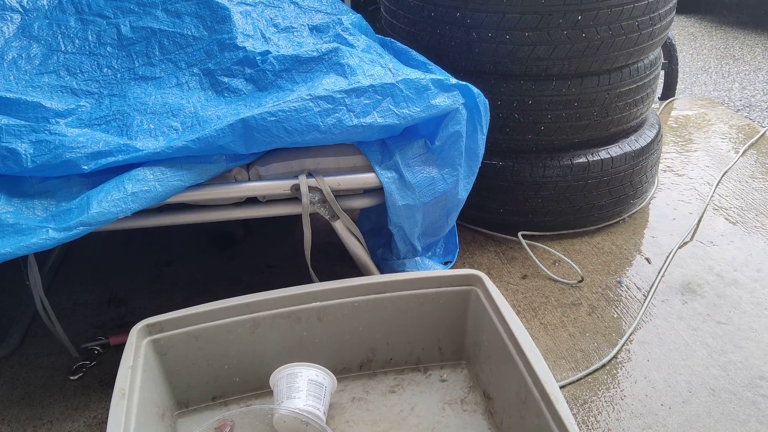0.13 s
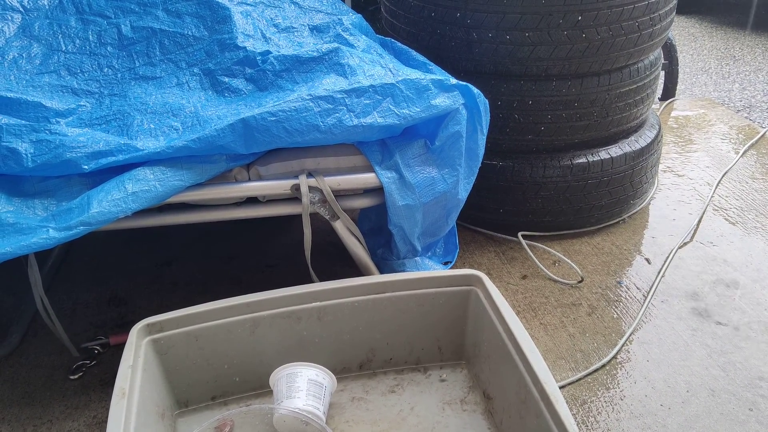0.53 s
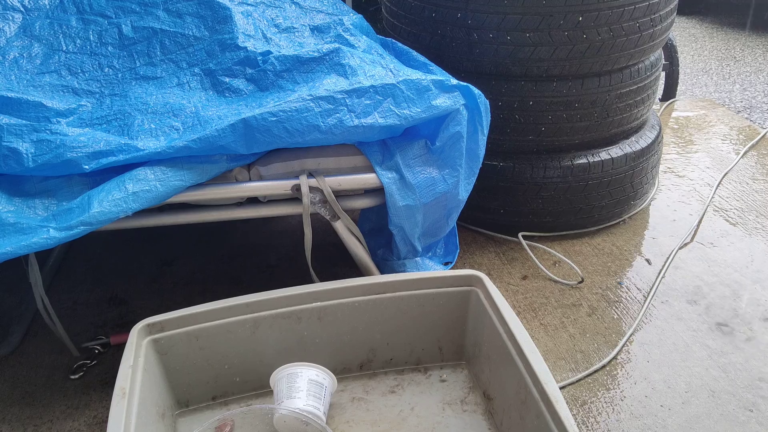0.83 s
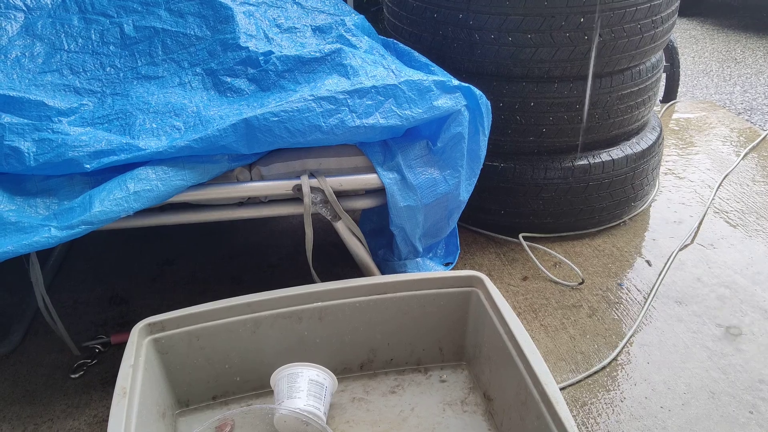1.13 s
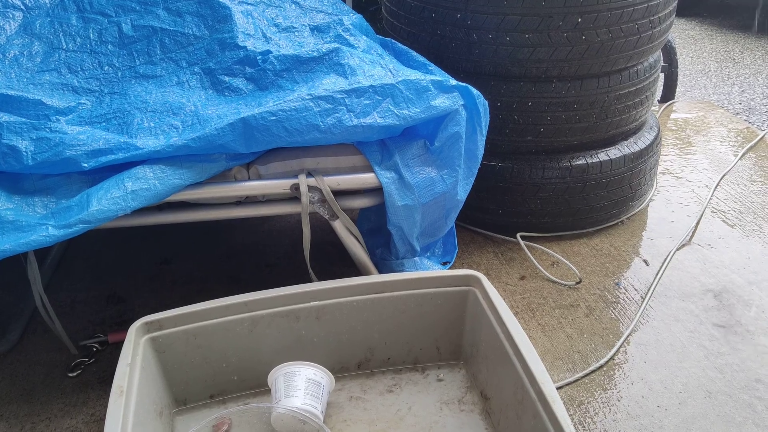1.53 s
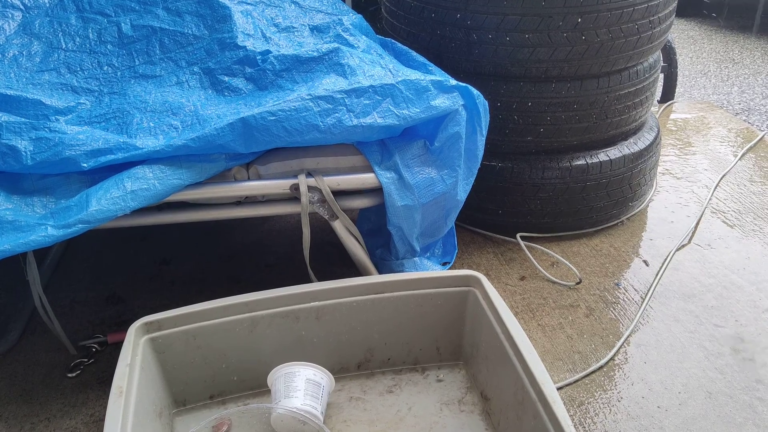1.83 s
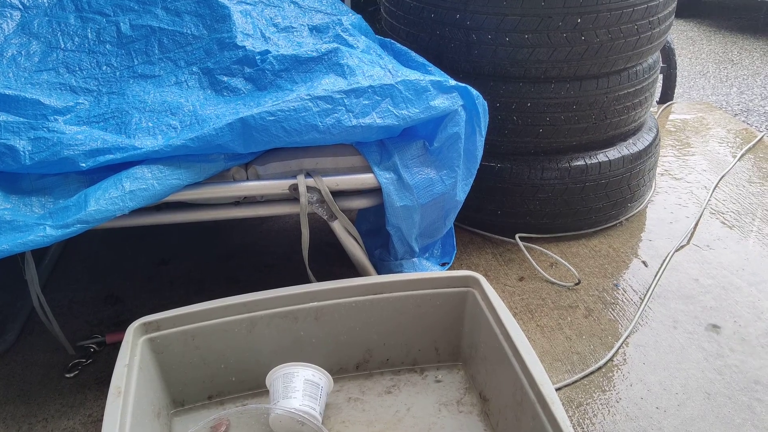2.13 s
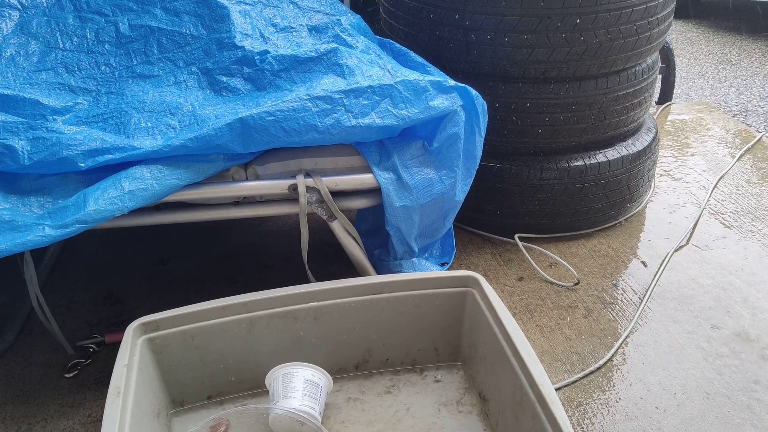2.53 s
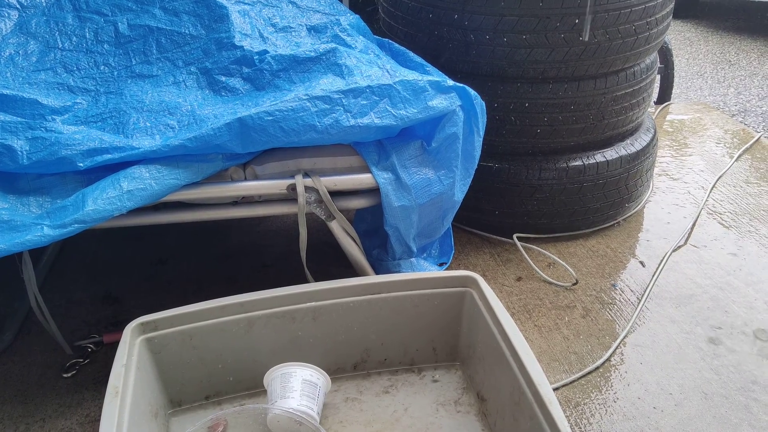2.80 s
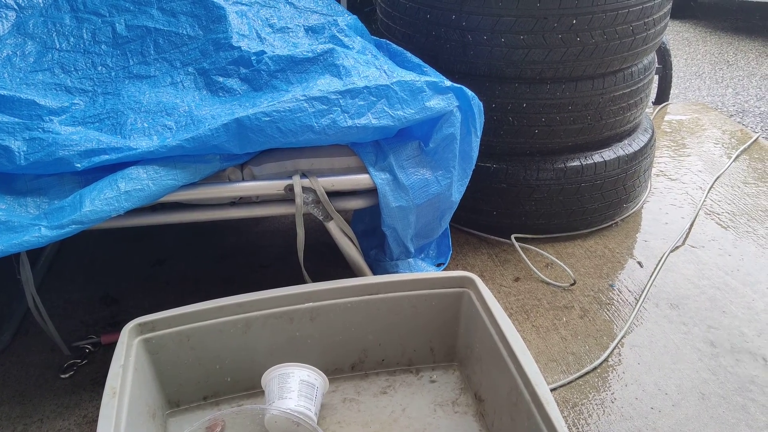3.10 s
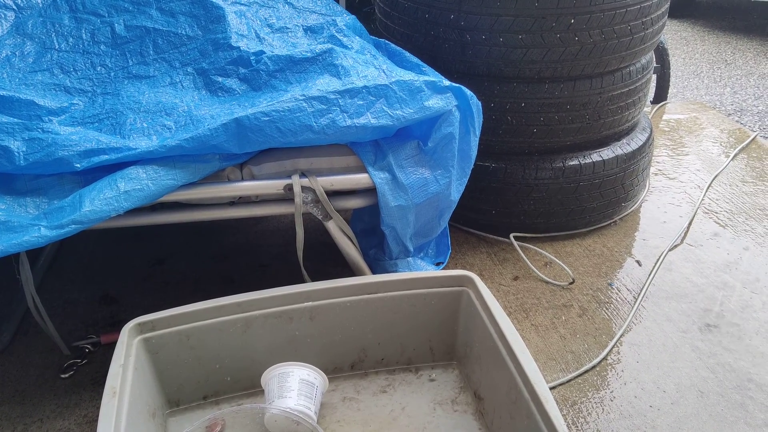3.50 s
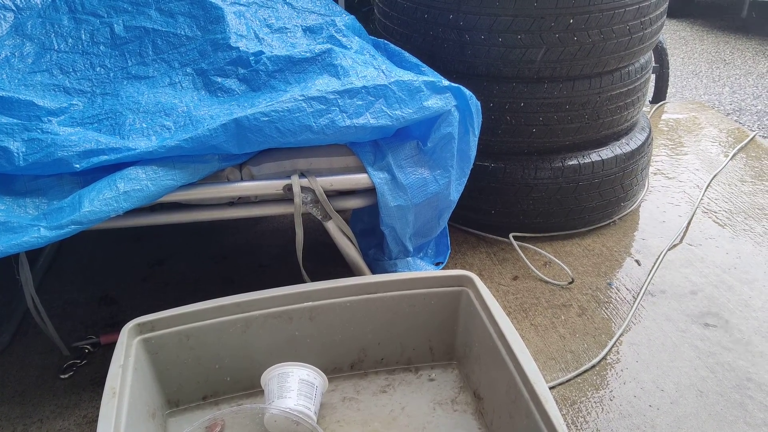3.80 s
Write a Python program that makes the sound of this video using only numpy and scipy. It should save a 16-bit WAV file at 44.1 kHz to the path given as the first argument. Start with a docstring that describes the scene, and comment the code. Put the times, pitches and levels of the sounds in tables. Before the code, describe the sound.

Rain on a plastic tarp: crisp, bright snaps with short crackling wet tails over steady hiss and tiny patter. Strong drops land at 0.15 s, then weaken around 0.8-1.5 s. More hits follow at 1.6-1.7, a heavy one at 2.4, and a dense run from 2.8, strongest near 3.7. Dull splashes scatter throughout; a soft scuff brushes at 3.1. A barely audible far engine and thin whine appear late, over faint hum.

```python
"""Outdoors, beside a taut plastic tarp over concrete, light rain is falling.
Big close drops snap on the tarp: a click, quick reflections and a short wet tail of crackling noise.
Small drops patter and bubble around them over the hiss of rain, made from shaped, flickering noise.
A few duller splashes and one soft scuff are soft-edged bursts of noise.
Gliding tones make a far engine that changes gear and a thin whine; a steady tone is the faint mains hum."""
import sys
import numpy as np
from scipy import signal
from scipy.fft import rfft, irfft
from scipy.io import wavfile
from scipy.ndimage import uniform_filter1d

SR = 44100
rng = np.random.default_rng(int(sys.argv[2]) if len(sys.argv) > 2 else 0)


def to_wav(sig):
    """Store sig (one row per channel, or 1-D mono) as 16-bit WAV at the path in sys.argv[1].

    Samples outside -1..1 are clipped; the rate is SR.
    """
    pcm = np.clip(np.atleast_2d(sig), -1, 1) * 32767
    pcm = np.round(pcm).astype(np.int16)
    wavfile.write(sys.argv[1], SR, pcm.T)  # frames by channels


N = 174195  # length of the scene in samples
RING_SAMPLES = 8192  # room for one drop or bubble to die away
TOP_HZ = 7980  # the sound is cut steeply above this

# Rain on concrete and the far surroundings. Each row: frequency in Hz, relative level in dB.
WASH_COLOUR = [(25, -42), (45, -29), (65, -14.5), (90, -24), (130, -7.5), (180, -10.5), (300, -10.5),
               (550, -14), (950, -13.5), (1500, -15.5), (2600, -17.5), (4000, -13.5), (5100, -12.5),
               (5800, -10), (6400, -1.5), (7000, -10), (7900, -14.5)]
WASH_DB = -49
WASH_SWELL_DB, WASH_SWELLS_PER_S = 0.32, 1.3
WASH_FLICKER_DB, WASH_FLICKERS_PER_S = 1.2, 25.205

# Treble of the steady rain over time. Each row: time in seconds, gain in dB.
TREBLE_GAIN = [(0, 2.5), (.48, -4), (.75, 0), (1.12, -3.5), (1.16, -11), (1.21, 1.5), (1.33, -2.5),
               (1.385, -8.5), (1.43, 0), (1.9, -0.5), (2.28, -3.5), (2.34, -2), (2.42, -2), (2.699, 2.5),
               (3.3, 0), (3.62, 1), (3.87, -2), (3.95, 0.5)]
TREBLE_FROM_HZ = 4260
FLICKER_WIDTH_HZ, FLICKER_PER_S, FLICKER_DB = 530, 28, 2.2

# Colour of a drop on the tarp. Each row: frequency in Hz, relative level in dB.
TARP_COLOUR = [(100, -57), (800, -53), (1500, -42.5), (2500, -33), (3300, -24.5), (4100, -20.5),
               (4900, -12.5), (5500, -8.5), (6100, -2.5), (6450, 1), (6900, -3), (7400, -9.5), (7900, -13)]
BODY_HZ, PEAK_HZ, BRIGHT_HZ = 4450, 6190, 7300  # body acts below the peak, brightness above it
SNAP_S = 0.0031  # the snap's energy equals this many seconds at full level

# Reflections off nearby surfaces. Each row: typical delay in seconds, level in dB against the click.
REFLECTIONS = [(.00125, -4), (.0026, -12)]
DELAY_SPREAD = 0.13  # each drop stretches the delays by chance, about 13 percent

# The wet tail after each snap
TAIL_DB, TAIL_RISE_S, TAIL_T60_S, TAIL_GRAIN_DB = 5, 0.0062, 0.17, 6.5  # T60: time to fall 60 dB
FLAP_DB, FLAP_S = 3, 0.0012  # the tail comes in uneven little flaps
SURFACE_SHARE = 0.35  # part of each tail's power that is the same scatter off the surroundings

# Faint rings of the plastic nearby. Each row: frequency in Hz, relative level in dB.
PLASTIC_RINGS = [(4930, -16.5), (6090, -1.5), (6330, 2.5), (6570, -9)]
RING_DB, RING_T60_S = -14.5, 0.13  # level before the rings die away

PATTER_PER_S, PATTER_SPREAD_DB, PATTER_DB, PATTER_TAIL_DB = 160, 4.2, -51, -9.5

# Faint bubbles in the puddles
BUBBLES_PER_S, BUBBLE_LOW_HZ, BUBBLE_HIGH_HZ = 50, 550.7, 2994
BUBBLE_RISE_PER_S = 1.2  # pitch gained per second, as a share of the starting pitch
BUBBLE_DB, BUBBLE_RANGE_DB, BUBBLE_ATTACK_S, BUBBLE_T60_S = -68, 8, 0.006, 0.079

HUM_HZ, HUM_DB = 119.6, -70

# Close drops on the tarp. Each row: start in seconds, snap level in dB before DROP_TRIM_DB is added,
# tail gain in dB against the snap, body in dB, brightness in dB.
CLOSE_DROPS = [(0.1461, -12.5, -11, 6, -5.5), (0.1624, -21, -16, 2, 4), (0.2123, -25, -14.5, -3, 5.5),
               (0.277, -49, -18, -5, 2.5), (0.3, -32, -11.5, 0, 4), (0.3913, -22.5, -10, -4.5, -8.5),
               (0.4086, -24, -10.5, -11.5, -24), (0.525, -30, -10, -4, 2), (0.5589, -19, -11.5, -9.5, -6),
               (0.6351, -25.5, -10.5, 0, -7.5), (0.716, -41.5, -6, -12, -4),
               (0.7848, -33.5, -9.5, -2, -2.5), (0.812, -39.5, -3, 2, 4), (0.8478, -34, -13.5, -6, 2.5),
               (0.877, -41, -16, -13, -11), (0.99, -43, -15, -10, -5), (1.021, -42, -15, -10, 4),
               (1.214, -39, -18, -10, 4), (1.2239, -33, -13, -6, 9), (1.2909, -30.5, -8.5, 0.5, -1.5),
               (1.3034, -32.5, -18, -13, -3.5), (1.4489, -31.5, -14, -7, -7), (1.4666, -37, -24, -4, 4),
               (1.5359, -32, -11.5, -5, -2), (1.594, -27, -12.5, -2, -0.5),
               (1.6253, -22, -11.5, -5.5, -7.5), (1.7145, -21, -10, -8.5, 0.5), (1.7336, -30, -6, -2, -1),
               (1.838, -28, -10, -5, 1.5), (2.12, -34.5, -9, -13.5, 0), (2.175, -40, -11, -6, -1),
               (2.198, -38, -7.5, 3.5, -3), (2.2361, -31.5, -13, 0.8, 9.5), (2.394, -13.5, -12.5, 4, -5),
               (2.4394, -35, -8, 11, 8), (2.451, -24, -14.5, -10, 3.5), (2.521, -46.5, -5, -4, -4),
               (2.5756, -23, -11.5, -9.5, -1), (2.7793, -40, -8, -4, -7), (2.814, -20.5, -12.5, 3, -0.5),
               (2.883, -35, -15, -11, 9), (2.933, -35, -20, 8, -2), (2.9966, -25.5, -10.5, 6, 7),
               (3.1212, -26, -8.5, -1, 2.5), (3.148, -30, -10.5, -13, 3.5), (3.1931, -24, -14, -5, 0.5),
               (3.2736, -24, -12.5, -11, 10), (3.299, -24, -10.5, -5.5, -19),
               (3.4131, -23, -11.5, -12.5, -5), (3.592, -39.5, -16, -6.5, -3.5), (3.62, -42.5, -10, -5, -1),
               (3.655, -39, -6.5, -6, -1), (3.682, -15.5, -12, -5.5, -4.5),
               (3.7408, -16.5, -11.5, -0.5, -1.5), (3.7965, -27.5, -11.5, -0.5, 4)]
DROP_TRIM_DB = 0.5

# Duller splashes further off. Each row: time of the peak in seconds, level in dB before the fades,
# centre in Hz, width in octaves, rise in seconds, time to fall 60 dB in seconds.
SPLASHES = [(.28, -57, 1400, 0.15, .006, 0.053), (.752, -56, 1910, 0.3, 0.0045, 0.065),
            (1.062, -47.5, 6700, .15, 0.0081, .12), (1.118, -47, 5820, .1, .012, 0.15),
            (1.195, -51, 6100, 0.055, 0.017, .12), (1.34, -53.5, 2640, 0.53, 0.022, 0.23),
            (1.42, -44.5, 5800, 0.43, 0.013, .14), (1.975, -54.5, 2080, 0.29, 0.006, .1),
            (2.935, -47, 2130, 0.11, 0.0045, .04), (3.63, -59, 750, 0.96, 0.027, 0.19),
            (3.755, -45.5, 3550, 0.17, 0.011, 0.098), (3.925, -47.5, 4200, 0.34, 0.015, 0.14)]
# A soft scuff, a low bump and then a swish. Each row: time of the peak in seconds, level in dB before
# the fades, centre in Hz, width in octaves, rise in seconds, time to fall 60 dB in seconds.
SCUFF = [(3.04, -51, 240, 1.4, 0.026, 0.42), (3.114, -46, 1095, 0.69, 0.024, 0.28),
         (3.118, -43, 2290, 1.1, 0.031, 0.3)]
BURST_LOW_HZ = 95  # splashes and scuff carry no deep bass

# Far engine. Each row: time in seconds, firing frequency in Hz, level in dB before the waver.
ENGINE = [(2.3, 164, -90), (2.42, 169, -70), (2.51, 176, -62), (2.58, 180, -71), (2.65, 160, -85),
          (2.73, 133, -68), (2.86, 136, -64), (3.02, 142, -68), (3.27, 144, -63), (3.42, 137, -71),
          (3.55, 142, -67), (3.66, 147, -61), (3.73, 156, -68), (3.8, 153, -65), (3.95, 146, -78)]
# A thin far whine. Each row: time in seconds, frequency in Hz, level in dB before the waver.
WHINE = [(3.25, 362, -90), (3.36, 358, -68), (3.45, 353, -66), (3.63, 361, -69), (3.75, 368, -90)]

LEAK_DB = -45.5  # shift of the faint sound that passes the steep cut


def undb(db):
    """Turn decibels into gain."""
    return 10 ** (np.asarray(db) / 20)


def level(x, db):
    """Scale a sound to an average (rms) level in dB."""
    return x * undb(db) / np.sqrt(np.mean(x ** 2))


def bins(size):
    """List the frequencies in the spectrum of a sound this long, never below 1 Hz."""
    return np.maximum(np.fft.rfftfreq(size, 1 / SR), 1)


def curve(points, hz):
    """Read (Hz, dB) points at any frequency, with octaves evenly spaced."""
    point_hz, db = np.array(points).T
    return np.interp(np.log(hz), np.log(point_hz), db)


def causal(db):
    """Build a minimum-phase response with this gain, so that a hit starts sharply."""
    cepstrum = irfft(np.log(undb(db)))
    half = len(cepstrum) // 2
    cepstrum[1:half] *= 2
    cepstrum[half + 1:] = 0
    return np.exp(rfft(cepstrum))


def noise(db):
    """Make noise with this gain at each frequency."""
    return irfft(rfft(rng.standard_normal(N)) * undb(db), N)


def walk(rate):
    """Wander smoothly by chance, with about this many random steps per second and a spread of 1."""
    step = int(SR / rate)
    stairs = np.repeat(rng.standard_normal(N // step + 2), step)
    smooth = uniform_filter1d(uniform_filter1d(stairs, step), step)[:N]
    return smooth / smooth.std()


def fade(t, t60):
    """Die away by 60 dB in t60 seconds."""
    return np.exp(-np.log(1000) * t / t60)


def add(out, start_s, x):
    """Mix a sound into out from this time."""
    i = int(np.clip(start_s * SR, 0, N - 1))
    out[i:i + len(x)] += x[:N - i]


def wash():
    """Distant rain: noise in octave bands that swell together and flicker alone."""
    hz, swell, out = bins(N), walk(WASH_SWELLS_PER_S), np.zeros(N)
    spectrum = rfft(noise(curve(WASH_COLOUR, hz)))
    for octave in np.arange(4, 15):  # band centres are powers of two, from 16 Hz up
        overlap = np.maximum(1 - abs(np.log2(hz) - octave), 0)
        band = irfft(spectrum * overlap, N)
        flicker_db = WASH_FLICKER_DB * walk(WASH_FLICKERS_PER_S)
        out += band * undb(WASH_SWELL_DB * swell + flicker_db)
    return level(out, WASH_DB)


def surroundings():
    """The scatter all drops share: dense random echoes, and a few plastic rings that die away."""
    t = np.arange(RING_SAMPLES) / SR
    echoes = rng.standard_normal(RING_SAMPLES)
    rings = sum(undb(db) * np.sin(2 * np.pi * (hz * t + rng.random())) for hz, db in PLASTIC_RINGS)
    return echoes, level(rings, RING_DB) * fade(t, RING_T60_S)


def drop(place, tail_db, body_db, bright_db, pitch=1):
    """A click and its reflections ring the tarp, then crackling spray and scattered echoes die away."""
    hz, t = bins(RING_SAMPLES), np.arange(RING_SAMPLES) / SR
    echoes, rings = place
    tilt_db = curve([(BODY_HZ, body_db), (PEAK_HZ, 0), (BRIGHT_HZ, bright_db)], hz)
    colour = causal(curve(TARP_COLOUR, hz / pitch) + tilt_db)

    paths = 1  # the direct click
    for delay_s, db in REFLECTIONS:
        delay_s = delay_s * np.exp(DELAY_SPREAD * rng.standard_normal())
        paths = paths + undb(db) * np.exp(-2j * np.pi * hz * delay_s)
    snap = irfft(colour * paths)
    snap /= np.sqrt(np.sum(snap ** 2) / (SNAP_S * SR))

    grain_gain = undb(TAIL_GRAIN_DB * rng.standard_normal(RING_SAMPLES))
    spray = level(rng.standard_normal(RING_SAMPLES) * grain_gain, 0)
    flap_gains = undb(FLAP_DB * np.clip(rng.standard_normal(RING_SAMPLES), -2, 2))
    flaps = flap_gains[(t / FLAP_S).astype(int)]
    mixed = np.sqrt(SURFACE_SHARE) * echoes + np.sqrt(1 - SURFACE_SHARE) * spray
    scatter = level(irfft(rfft(flaps * mixed) * colour), TAIL_DB)
    tail = scatter * fade(t, TAIL_T60_S) + rings
    rise = np.minimum(t / TAIL_RISE_S, 1) ** 0.5
    return snap + undb(tail_db) * rise * tail


def patter(place, colour_spread_db=3, pitch_spread=0.055):
    """Many small drops at random moments, each on a patch of tarp with its own pitch."""
    out = np.zeros(N)
    for _ in range(int(PATTER_PER_S * N / SR)):
        when, size = rng.random(2)
        body, bright, pitch = rng.standard_normal(3)
        tap = drop(place, PATTER_TAIL_DB, colour_spread_db * body, colour_spread_db * bright,
                   np.exp(pitch_spread * pitch))
        tap_db = PATTER_SPREAD_DB * min(-np.log(size), 2)  # most taps are weak, few are strong
        add(out, when * N / SR, undb(tap_db) * tap)
    return level(out, PATTER_DB)


def steady_rain(place):
    """Wash and patter: narrow treble bands flicker on their own and share a few brief lulls."""
    rain, hz = wash() + patter(place), bins(N)
    treble = rfft(rain) / (1 + (TREBLE_FROM_HZ / hz) ** 10)
    flickering = np.zeros(N)
    for centre in np.arange(0, TOP_HZ + 2 * FLICKER_WIDTH_HZ, FLICKER_WIDTH_HZ):
        overlap = np.maximum(1 - abs(hz - centre) / FLICKER_WIDTH_HZ, 0)
        band = irfft(treble * overlap, N)
        flickering += band * undb(FLICKER_DB * walk(FLICKER_PER_S))
    shared_db = np.interp(np.arange(N) / SR, *np.array(TREBLE_GAIN).T)
    # swap the plain treble for the flickering one
    return rain - irfft(treble, N) + flickering * undb(shared_db)


def bubbles():
    """Tiny bubbles ring briefly in the puddles, rising in pitch."""
    out, t = np.zeros(N), np.arange(RING_SAMPLES) / SR
    attack = np.minimum(t / BUBBLE_ATTACK_S, 1)
    for when, pitch, size in rng.random((int(BUBBLES_PER_S * N / SR), 3)):
        hz = BUBBLE_LOW_HZ * (BUBBLE_HIGH_HZ / BUBBLE_LOW_HZ) ** pitch
        tone = np.sin(2 * np.pi * hz * t * (1 + BUBBLE_RISE_PER_S * t / 2))
        ring = tone * attack * fade(t, BUBBLE_T60_S)
        add(out, when * N / SR, undb(BUBBLE_RANGE_DB * size) * ring)
    return level(out, BUBBLE_DB)


def mains_hum():
    """One faint steady tone of the mains."""
    return level(np.sin(2 * np.pi * HUM_HZ * np.arange(N) / SR), HUM_DB)


def close_drops(place):
    """The big drops striking the tarp, each with its own weight and colour."""
    out = np.zeros(N)
    for start_s, db, tail_db, body_db, bright_db in CLOSE_DROPS:
        add(out, start_s, undb(db + DROP_TRIM_DB) * drop(place, tail_db, body_db, bright_db))
    return out


def soft_bursts(rows, grain_db=3, ragged_db=3):
    """Splashes or a scuff: fine grains of noise in one broad resonance each, with soft edges."""
    t, hz, out = np.arange(N) / SR, bins(N), np.zeros(N)
    for peak_s, db, centre, width, rise_s, t60 in rows:
        grains = rng.standard_normal(N) * undb(grain_db * rng.standard_normal(N))
        resonance = 1 / (1 + (np.log2(hz / centre) / width) ** 2)
        low_cut = 1 / (1 + (BURST_LOW_HZ / hz) ** 6)
        body = irfft(rfft(grains) * resonance * low_cut, N)
        swell = np.exp(-(np.minimum(t - peak_s, 0) / rise_s) ** 2)
        out += level(body, db) * swell * fade(np.maximum(t - peak_s, 0), t60)
    return out * undb(ragged_db * walk(250))


def drone(rows, waver_db=0.2):
    """The far engine or whine: one tone that glides in pitch and wavers in level."""
    t, (point_s, point_hz, point_db) = np.arange(N) / SR, np.array(rows).T
    turns = np.cumsum(np.interp(t, point_s, point_hz)) / SR
    db = np.interp(t, point_s, point_db) + waver_db * walk(14)
    return np.sqrt(2) * np.sin(2 * np.pi * turns) * undb(db)  # root two makes the level rms


def scene():
    """Drops in front, steady rain and far machines behind."""
    place = surroundings()
    rain = steady_rain(place) + bubbles()
    hits = close_drops(place) + soft_bursts(SPLASHES) + soft_bursts(SCUFF, grain_db=3.5)
    machines = mains_hum() + drone(ENGINE) + drone(WHINE)
    return (rain + hits + machines)[None]


def record(dry):
    """Cut the top steeply, with a faint copy of the whole sound passing through up to 15.5 kHz, weaker above 8
    kHz."""
    steep = signal.firwin(801, TOP_HZ, fs=SR)
    leak_hz, leak_gain = [0, 8000, 10000, 15000, 15500, SR / 2], [2.5, 2.5, 0.8, 0.25, 0, 0]
    leak = signal.firwin2(801, leak_hz, leak_gain, fs=SR)
    return signal.fftconvolve(dry, (steep + undb(LEAK_DB) * leak)[None], mode="same")


dry = scene()
out = record(dry)
to_wav(out)
```